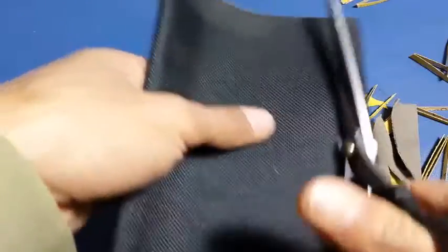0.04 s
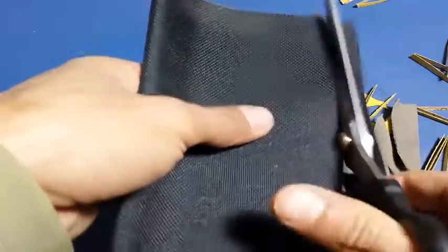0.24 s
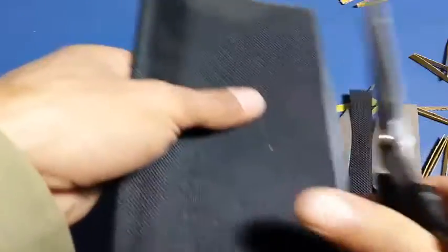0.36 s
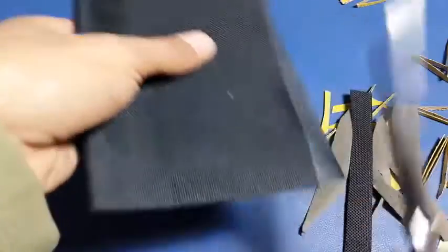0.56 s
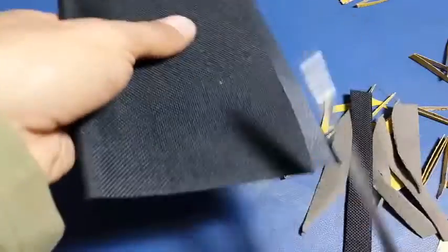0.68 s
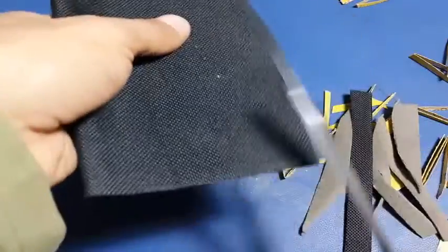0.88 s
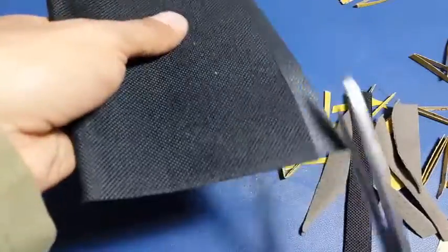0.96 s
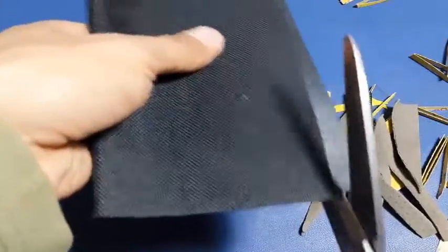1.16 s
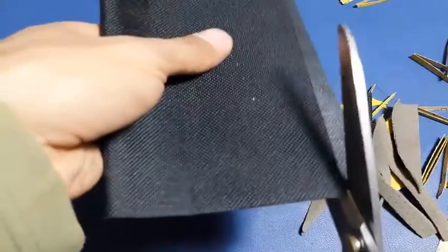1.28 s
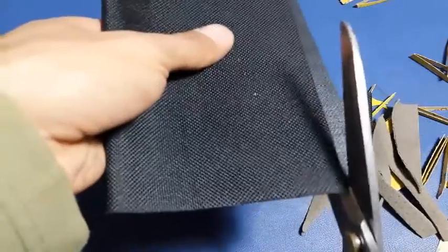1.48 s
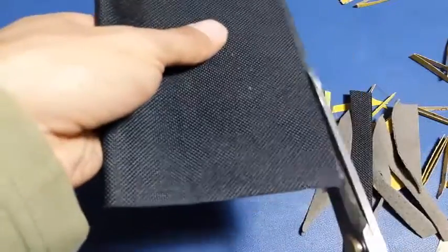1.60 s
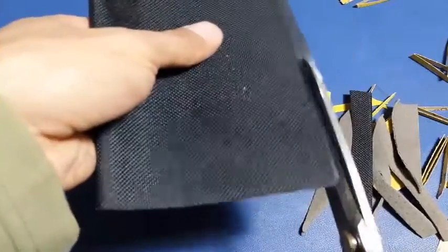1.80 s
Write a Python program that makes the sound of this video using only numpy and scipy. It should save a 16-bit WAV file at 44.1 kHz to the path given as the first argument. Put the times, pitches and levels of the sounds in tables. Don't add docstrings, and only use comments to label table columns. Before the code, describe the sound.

Close stereo pickup on a table indoors: scissors snap shut hard through thick cloth, fabric rustles faintly with low handling hum, then a swelling, crackling cut ends in knocks and a last rub.

```python
import sys
import numpy as np
from scipy import signal
from scipy.fft import rfft, irfft
from scipy.io import wavfile
from scipy.ndimage import uniform_filter1d, minimum_filter1d

SR = 44100
rng = np.random.default_rng(int(sys.argv[2]) if len(sys.argv) > 2 else 0)


def inscribe(sig):
    pcm = np.round(np.clip(np.atleast_2d(sig).T, -1, 1) * 32767)
    wavfile.write(sys.argv[1], SR, pcm.astype(np.int16))


def voltage_ratio(level):
    return 10 ** (np.asarray(level, float) / 20)


N = 81585
T = np.arange(N) / SR
PORT_HZ = np.fft.rfftfreq(N, 1 / SR)


def evened(x):
    return x / np.sqrt(np.mean(x ** 2) + 1e-20)


def read(points, hz):
    f, value = np.transpose(points)
    return np.interp(np.log(hz + 1), np.log(f + 1), value)


def colour(x, points):
    db = read(points, np.fft.rfftfreq(2048, 1 / SR))
    log_gain = np.log(voltage_ratio(np.r_[db, db[-2:0:-1]]))
    taps = np.fft.ifft(np.exp(np.conj(signal.hilbert(log_gain)))).real
    return signal.oaconvolve(x, taps[None, :1024], axes=1)[:, :N]


def resonate(x, hz, width_hz):
    turn = np.exp(2j * np.pi * np.cumsum(hz * np.ones(N)) / SR)
    r = np.exp(-np.pi * width_hz / SR)
    return 2 * (turn * signal.lfilter([1 - r], [1, -r], x / turn)).real


def drift(seconds):
    size = max(int(seconds * SR), 2)
    return evened(uniform_filter1d(uniform_filter1d(rng.standard_normal(N), size), size))


# t/s, level/dB
PRESSURE = [(0, -69), (.2, -68), (.42, -73), (.55, -74), (.7, -70), (.95, -63), (1.05, -64), (1.2, -62),
            (1.28, -72), (1.42, -75), (1.53, -66), (1.68, -64), (1.75, -72), (1.85, -67)]


def pressure():
    s, db = np.transpose(PRESSURE)
    hum_hz, top_hz, top_db = 98, 250, -10
    low, top = rng.standard_normal((2, N))
    hum = evened(resonate(resonate(low, hum_hz, 50), hum_hz, 120))
    wander_hz = top_hz * (1 + .15 * drift(.15))
    creak = evened(resonate(resonate(top, wander_hz, 40), top_hz, 200))
    level_db = np.interp(T, s, db) - 1 + 2.5 * drift(.05)
    return voltage_ratio(level_db) * (hum + voltage_ratio(top_db) * creak)


# f/Hz, level/dB per Hz
ROOM_SPECTRUM = [(20, -8), (40, -2), (220, -13), (300, -9), (900, -17), (1600, -21), (8100, -18),
                 (9400, -29)]
# f/Hz, likeness/0..1
ROOM_LIKENESS = [(60, 0.78), (220, 0.53), (780, 0.11), (2840, 0.02), (10300, 0.03)]
# f/Hz, level/dB
PORT_DIFFERENCE = [(300, -1.5), (1200, -3), (3300, -2), (6000, -6), (10000, -6.5)]


def room():
    frames, hz = N // 256 + 5, np.fft.rfftfreq(1024, 1 / SR)
    a, b, c, d, patches = rng.standard_normal((frames, 513, 5)).T
    patches = evened(uniform_filter1d(uniform_filter1d(patches, 12, 0), 10, 1))
    same = np.clip(read(ROOM_LIKENESS, hz), -1, 1)[:, None]
    left = a + 1j * b
    z = np.array([left, same * left + np.sqrt(1 - same ** 2) * (c + 1j * d)])
    z *= voltage_ratio(read(ROOM_SPECTRUM, hz)[:, None] + 1.5 * patches)
    z *= voltage_ratio(read(PORT_DIFFERENCE, hz)[:, None] * [[[.5]], [[-.5]]])
    return voltage_ratio(-67.5) * evened(signal.istft(z, nperseg=1024, noverlap=768)[1][:, :N])


# f/Hz, likeness/0..1
CLOTH_LIKENESS = [(300, .8), (1100, .55), (2400, .4), (5000, .3), (10000, .15)]


def snaps():
    snaps_per_s, spread_db, flutter_db, flutter_s = 10000, 2, 1.4, .004
    size = voltage_ratio(spread_db * np.minimum(rng.exponential(1, (2, N)), 5)) * rng.standard_normal((2, N))
    struck = rng.random((2, N)) < snaps_per_s / SR * voltage_ratio(flutter_db * drift(flutter_s))
    a, b = rfft(size * struck)
    same = np.clip(read(CLOTH_LIKENESS, PORT_HZ), 0, 1)
    left = (same * a + np.sqrt(1 - same ** 2) * b) * voltage_ratio(read(PORT_DIFFERENCE, PORT_HZ))
    return irfft(np.array([left, a]), N)


def patchy(x):
    z = signal.stft(x, nperseg=512)[2]
    patches = rng.standard_normal(z.shape[1:])
    patches = uniform_filter1d(uniform_filter1d(patches, size=4, axis=0), size=8, axis=1)
    return evened(signal.istft(z * voltage_ratio(2.8 * evened(patches)), nperseg=512)[1][:, :N])


def sheen(x, power):
    edge_hz, full_db, slope = 8600, -50, .7
    top = signal.sosfiltfilt(signal.butter(4, edge_hz, "high", fs=SR, output="sos"), x)
    return x - top * (1 - voltage_ratio(slope * np.minimum(10 * np.log10(power) - full_db, 0)))


# peak t/s, rise/s per 20 dB, fall/s per 20 dB, level/dB, body share/dB
STROKES = [(.005, .05, .05, -47, -8), (.045, .04, .04, -50, -3), (.165, .02, .015, -69, 7),
           (.183, .007, .022, -40, -8), (.199, .012, .012, -31, -2), (.209, .006, .007, -36, -6),
           (.224, .007, .015, -37, -6), (.252, .022, .062, -31, -19), (.33, .03, .055, -53, -4),
           (.435, .05, .08, -43, -12), (.6, .09, .1, -55, -12), (.68, .03, .04, -62, -9),
           (.75, .1, .1, -70, -1), (1.11, .06, .06, -63, -3), (.825, .035, .07, -61, -8),
           (.89, .03, .04, -64, -8), (.96, .02, .12, -57, -3), (.52, .06, .06, -66, -6),
           (.925, .04, .04, -67, -4), (1.04, .05, .1, -60, -5), (1.175, .05, .04, -52, -6),
           (1.215, .03, .065, -50, -8), (1.66, .04, .08, -61, -6), (1.775, .02, .03, -50, -6),
           (1.805, .03, .055, -37, -10)]
# t/s, effort level/dB, body share/dB
LONG_CUT = [
    (1.452, -70, -8),
    (1.457, -46, -9),
    (1.468, -42, -10),
    (1.5, -35, -9),
    (1.535, -30, -8),
    (1.565, -27, -6),
    (1.583, -27, -7),
    (1.591, -35, -8),
    (1.65, -63, -6),
]
# f/Hz, level/dB per Hz
FIZZ_SPECTRUM = [(2000, -26), (3300, -11), (4900, -11), (5600, -3), (7000, 0), (7900, -2), (8500, -8),
                 (10800, -10)]
# f/Hz, level/dB per Hz
BODY_SPECTRUM = [(150, -20), (350, -12), (700, 0), (1200, -4), (2000, -3), (3000, -1), (4500, -6),
                 (6000, -20)]


def cloth():
    s, effort_db, share_db = np.transpose(LONG_CUT)
    fizz = voltage_ratio(np.interp(T, s, effort_db, -120, -120)) ** 2
    body = fizz * voltage_ratio(np.interp(T, s, share_db)) ** 2
    for peak_s, rise_s, fall_s, db, body_db in STROKES:
        away = abs(T - peak_s) / np.where(T < peak_s, rise_s, fall_s)
        stroke = voltage_ratio(db - 20 * away ** 1.5) ** 2
        fizz = fizz + stroke
        body = body + stroke * voltage_ratio(body_db) ** 2
    fizzing = np.sqrt(fizz) * sheen(patchy(colour(snaps(), FIZZ_SPECTRUM)), fizz)
    return fizzing + np.sqrt(body) * patchy(colour(snaps(), BODY_SPECTRUM))


# t/s, peak level/dB, f/Hz
THICK_THREADS = [(.176, -33, 5600), (.1813, -28, 5600), (.1858, -28, 7200), (.191, -28, 2600),
                 (.1952, -18, 3800), (.1968, -18, 5800), (.1988, -16, 4200), (.2015, -19, 5800),
                 (.2035, -24, 3500), (.21, -26, 3200), (.224, -27, 3800), (.2285, -27, 5200),
                 (.9573, -46, 4000), (1.0245, -42, 4500), (1.1614, -42, 6000), (1.4553, -37, 5500),
                 (1.4828, -26, 6000), (1.5495, -18, 5000), (1.5525, -18, 6000), (1.571, -17, 6000),
                 (1.5738, -14, 6000), (1.5785, -27, 5500), (1.5808, -8, 6000), (1.5853, -15, 5800),
                 (1.7723, -48, 7000), (1.7935, -36, 7600), (1.798, -28, 6500), (1.803, -28, 6500),
                 (1.808, -27, 6200), (1.8125, -29, 6500)]


def threads():
    out, t = np.zeros(N + 300), T[:300]
    cycles_per_20db = 2.5
    for s, db, hz in THICK_THREADS:
        crack = voltage_ratio(db - 20 * t * hz / cycles_per_20db) * np.sin(2 * np.pi * hz * t)
        out[round(s * SR):][:300] += crack
    return out[:N]


def ring(modes, shift):
    t, detune, contact_s = T[:1500], .03, .00012
    x = np.zeros(len(t))
    for (hz, db, t60), d in zip(modes, shift):
        x += voltage_ratio(db - 60 * t / t60) * np.sin(2 * np.pi * hz * (1 + detune * d) * t)
    x = x * np.minimum(t / contact_s, 1)
    return x / abs(x).max()


# t/s, peak level/dB, handle share/dB
METAL_TICKS = [(.2311, 4, -6), (.2319, -4, -12), (.2342, -6, -14), (.237, -13, -14), (.325, -39, -3),
               (.427, -34, -9), (.723, -49, -6), (.884, -45, -8), (1.0237, -42, -3), (1.199, -21, -9),
               (1.2025, -31, -12), (1.2245, -37, -8), (1.5735, -20, -4), (1.5807, -15, -2),
               (1.5852, -20, -6), (1.665, -45, -6), (1.817, -26, -12)]
# f/Hz, level/dB, t60/s
STEEL_MODES = [(5600, -4, .007), (6500, -2, .012), (7300, 0, .011), (7900, -1, .008), (9000, -9, .005),
               (10300, -14, .004)]
# f/Hz, level/dB, t60/s
HANDLE_MODES = [(750, -5, .008), (1150, -1, .005), (1650, 1, .005), (2400, 0, .005), (3200, 0, .005),
                (4400, 2, .004)]


def ticks():
    steel, handle = np.zeros((2, N + 1500))
    shifts = rng.standard_normal((len(METAL_TICKS), 2, 8))
    for (s, db, body_db), shift in zip(METAL_TICKS, shifts):
        start = round(s * SR)
        steel[start:][:1500] += voltage_ratio(db) * ring(STEEL_MODES, shift[0])
        handle[start:][:1500] += voltage_ratio(db + body_db) * ring(HANDLE_MODES, shift[1])
    high = signal.butter(2, 400, "high", fs=SR, output="sos")
    return steel[:N], signal.sosfilt(high, handle[:N])


def puff():
    start_s, level_db, left_db, dip_s, swell_s = .2313, -9, -26, .0006, .0017
    u = np.maximum(T - start_s, 0)
    dip, swell = u / dip_s, u / swell_s
    suck = dip * np.exp(1 - dip)
    push = .48 * swell ** 2 * np.exp(1.3 - swell) * (1 - swell / 5)
    return voltage_ratio(level_db) * (push - suck) * voltage_ratio(np.array([[left_db], [0]]))


# t/s, f/Hz, level/dB, t60/s
TABLE_KNOCKS = [
    (.232, 110, -39, .1),
    (.327, 105, -40, .12),
    (1.505, 100, -43, .12),
    (1.55, 60, -54, .15),
    (1.66, 110, -55, .12),
    (1.79, 100, -57, .08),
]


def thuds():
    out = np.zeros(N)
    for s, hz, db, t60 in TABLE_KNOCKS:
        u = np.maximum(T - s, 0)
        out += voltage_ratio(db - 60 * u / t60) * np.minimum(u / .004, 1) * np.sin(2 * np.pi * hz * u)
    return out


# start t/s, length/s, from f/Hz, to f/Hz, level/dB
TABLE_CREAKS = [
    (.67, .08, 320, 240, -66),
    (.81, .15, 270, 170, -64),
    (1.47, .08, 220, 260, -54),
    (1.62, .08, 240, 220, -60),
]


def creaks():
    out = np.zeros(N)
    for s, length_s, from_hz, to_hz, db in TABLE_CREAKS:
        u = np.clip((T - s) / length_s, 0, 1)
        hz = (from_hz + (to_hz - from_hz) * u) * (1 + .04 * drift(.01))
        moan = np.sin(2 * np.pi * np.cumsum(hz) / SR)
        out += voltage_ratio(db + 2 * drift(.015)) * np.sin(np.pi * u) * moan
    return out


# t/s, f/Hz, level/dB
BLADE_SQUEAL = [
    (1.462, 5400, -60),
    (1.468, 5600, -38),
    (1.49, 6000, -39),
    (1.503, 6400, -30),
    (1.511, 6900, -27),
    (1.521, 7800, -31),
    (1.533, 7900, -40),
    (1.553, 8500, -38),
    (1.562, 8800, -55),
]


def squeal():
    width_hz, stick_per_s, stick_db, under_hz, under_db = 450, 200, 5, 3050, -39
    s, hz, db = np.transpose(BLADE_SQUEAL)
    pitch, noise = np.interp(T, s, hz), rng.standard_normal(N)
    tone = np.sqrt(2) * np.sin(2 * np.pi * np.cumsum(pitch * (1 + .01 * drift(.0015))) / SR)
    rough = evened(resonate(resonate(noise, pitch, width_hz), pitch, 2 * width_hz))
    whistle = .7 * tone + .75 * rough
    under_env = voltage_ratio(under_db - 20 * ((T - 1.512) / .008) ** 2)
    under = under_env * np.sin(2 * np.pi * under_hz * T + drift(.003))
    sticking_db = stick_db * np.sin(2 * np.pi * stick_per_s * T + drift(.01))
    return voltage_ratio(np.interp(T, s, db, -120, -120) + sticking_db) * whistle + under


def ports(x):
    early_db, early_s, tail_db, tail_t60 = -6, .003, -13, .12
    t = T[:12000]
    hits = rng.random((2, 2, len(t))) < [[[.12]], [[.05]]]
    sparse = rng.standard_normal((2, 2, len(t))) * hits
    early, tail = sparse[0] * voltage_ratio(-20 * t / early_s), sparse[1] * voltage_ratio(-60 * t / tail_t60)
    taps = voltage_ratio(early_db) * early / np.linalg.norm(early, axis=1)[:, None]
    taps += voltage_ratio(tail_db) * tail / np.linalg.norm(tail, axis=1)[:, None]
    taps[0, 1] += 1
    taps[1, 0] += 1
    taps /= np.linalg.norm(taps, axis=1)[:, None]
    left, right = signal.oaconvolve(x[None], taps, axes=1)[:, :N]
    return np.array([irfft(rfft(left) * voltage_ratio(read(PORT_DIFFERENCE, PORT_HZ)), N), right])


# f/Hz, level/dB
TABLE_ECHO_DIP = [(3700, 0), (4400, -2), (5000, -4), (5500, 0)]


def scene():
    table = pressure() + room() + creaks()
    cutting = voltage_ratio(3.5) * colour(cloth(), TABLE_ECHO_DIP) + voltage_ratio(4) * ports(squeal())
    cracks = voltage_ratio(5) * ports(threads())
    steel, handle = ticks()
    clacks = voltage_ratio(np.array([[3], [0]])) * ports(steel) + voltage_ratio(np.array([[-6], [0]])) * ports(handle)
    return table + cutting + cracks + clacks + thuds() + puff()


# f/Hz, level/dB
MUTE_FLOOR = [(7900, -30), (8500, -4), (10800, 0)]


def starve(x):
    band_bins, under_db, spread_db, side_db, mute_db, attack_peak = 8, -7.5, 3, 2.5, -93, .4
    mid_side = np.array([x[0] + x[1], x[0] - x[1]]) / 2
    hz, t, z = signal.stft(mid_side, SR, nperseg=2048)
    band = np.arange(len(hz)) // band_bins
    starts = np.flatnonzero(np.diff(band, prepend=-1))
    level_db = 10 * np.log10(np.add.reduceat(abs(z) ** 2, starts, axis=1) + 1e-20)
    around_db = uniform_filter1d(level_db.mean(0), size=13, axis=0) + np.array([[[0]], [[side_db]]])
    luck = uniform_filter1d(rng.standard_normal(level_db.shape), size=3, axis=2) * np.sqrt(3)
    stands_out = level_db > around_db + under_db + spread_db * luck
    audible = level_db > mute_db + read(MUTE_FLOOR, hz[starts])[:, None]
    peak = -minimum_filter1d(-abs(x).max(0), size=2048)
    attack = np.interp(t, T, peak) > attack_peak
    keep = (stands_out & audible) | attack
    mid, side = signal.istft(z * keep[:, band], nperseg=2048)[1][:, :N]
    return np.array([mid + side, mid - side])


def top_cut(x):
    return signal.sosfilt(signal.butter(12, 10870, fs=SR, output="sos"), x)


def record(dry):
    low_pass = signal.firwin(255, 10900, window=("kaiser", 8), fs=SR)
    limited = signal.oaconvolve(dry, low_pass[None], "same")
    mix = np.clip(starve(limited), -.98, .98)
    return top_cut(mix)


dry = scene()
out = record(dry)
inscribe(out)
```